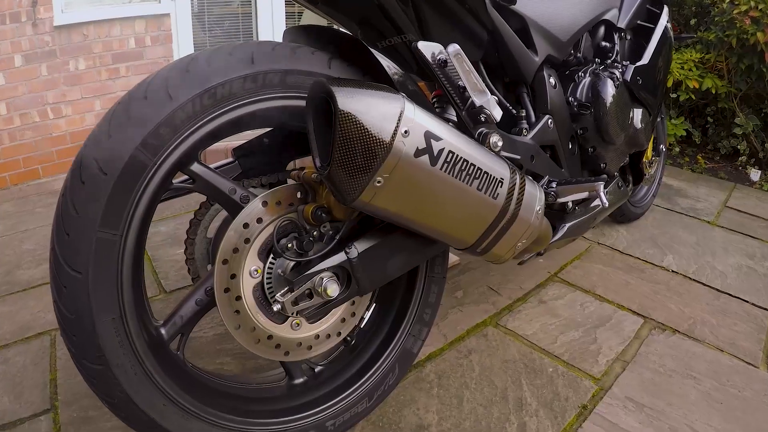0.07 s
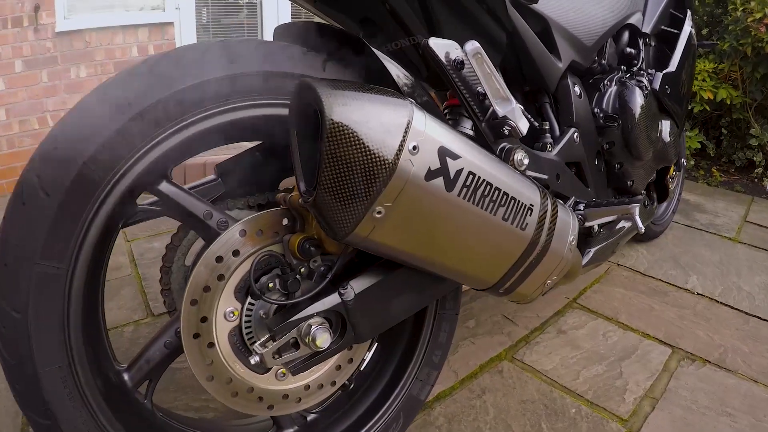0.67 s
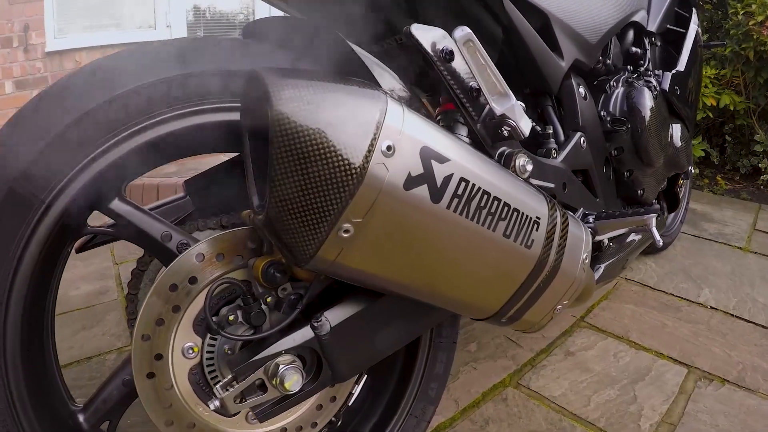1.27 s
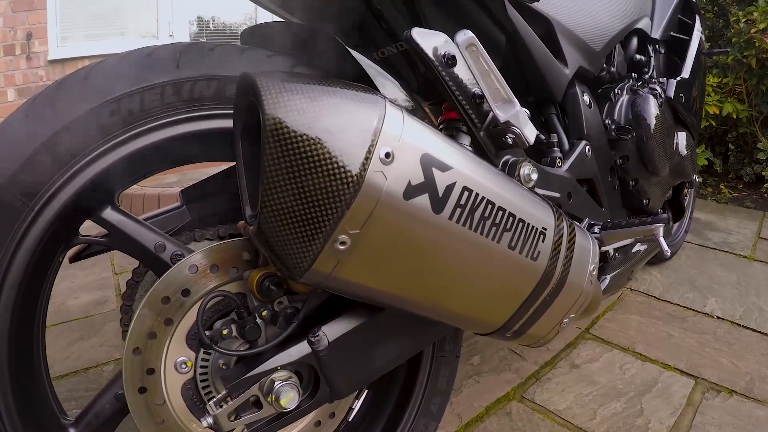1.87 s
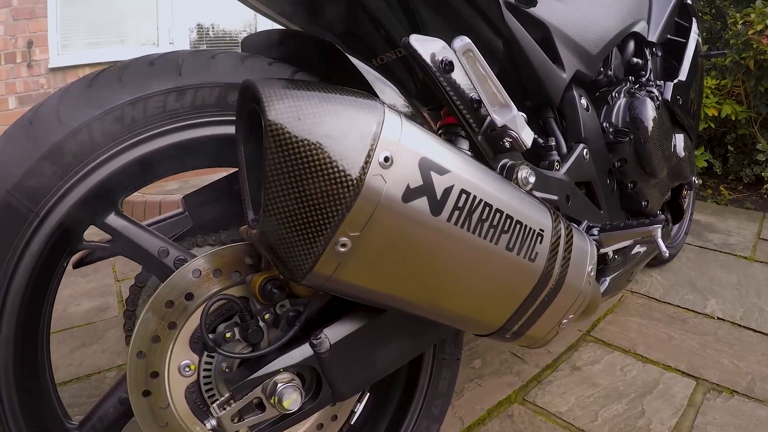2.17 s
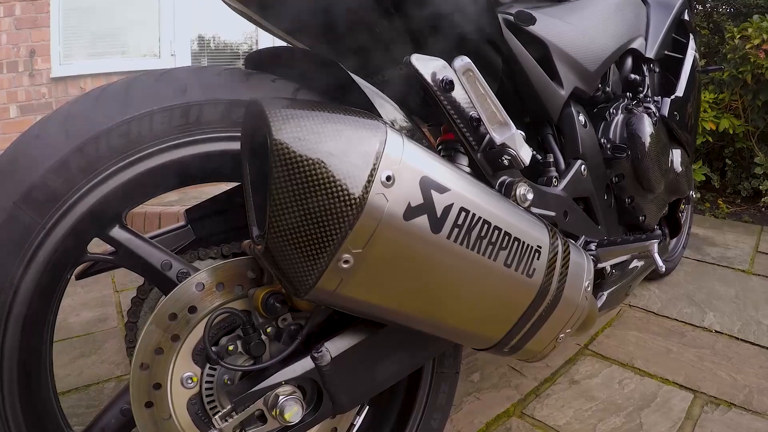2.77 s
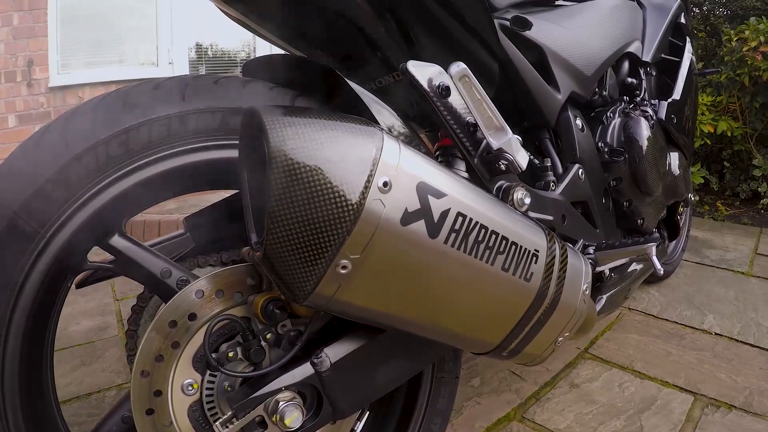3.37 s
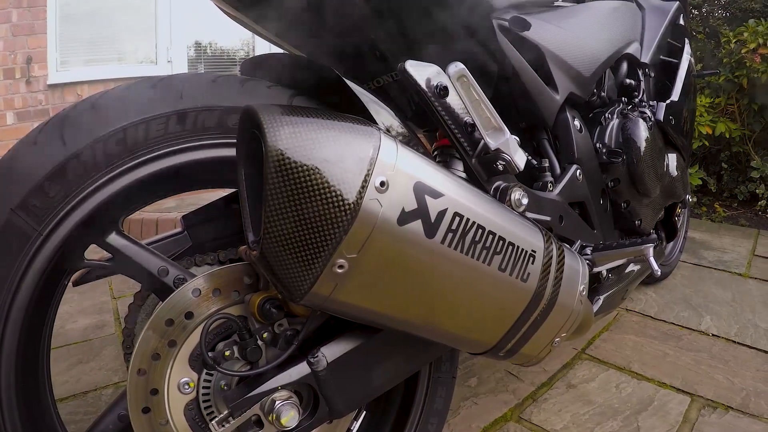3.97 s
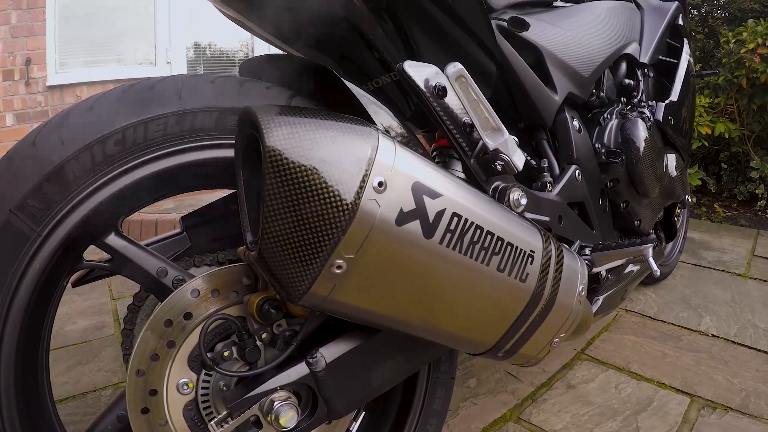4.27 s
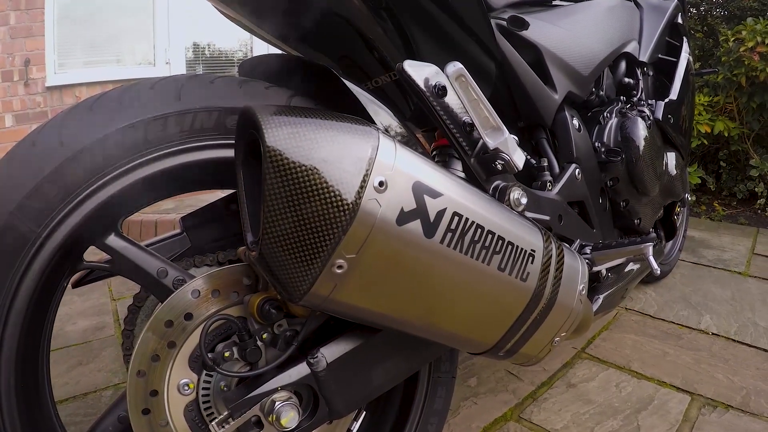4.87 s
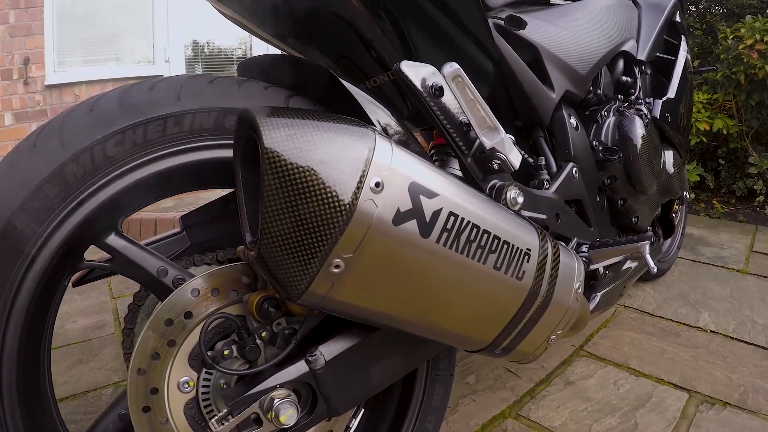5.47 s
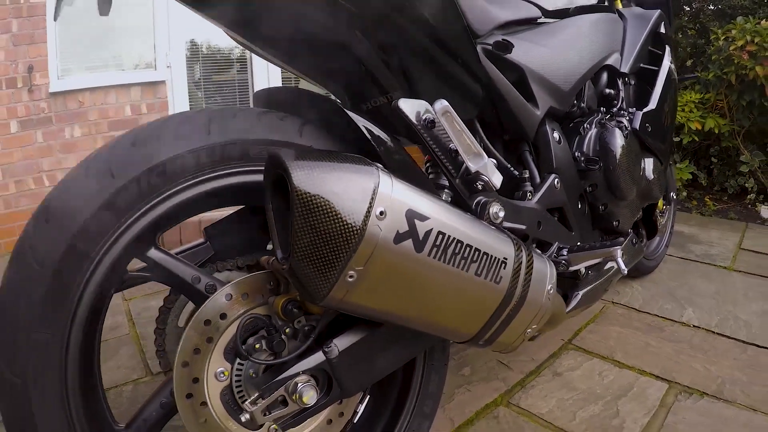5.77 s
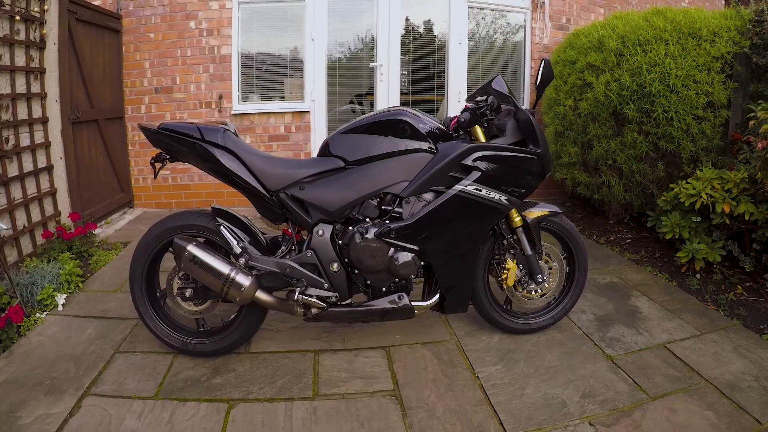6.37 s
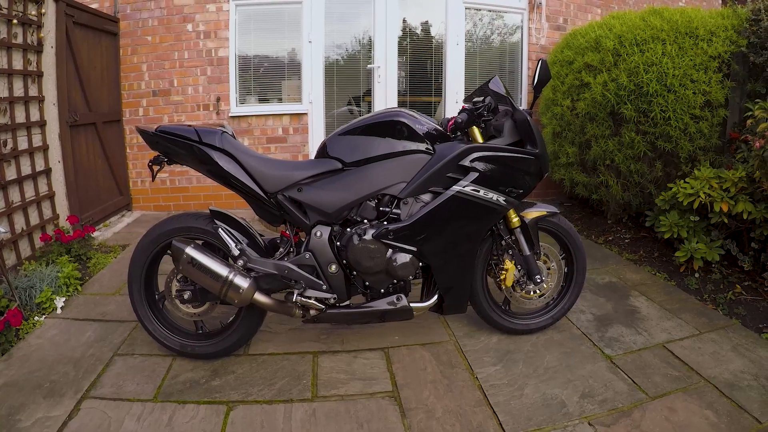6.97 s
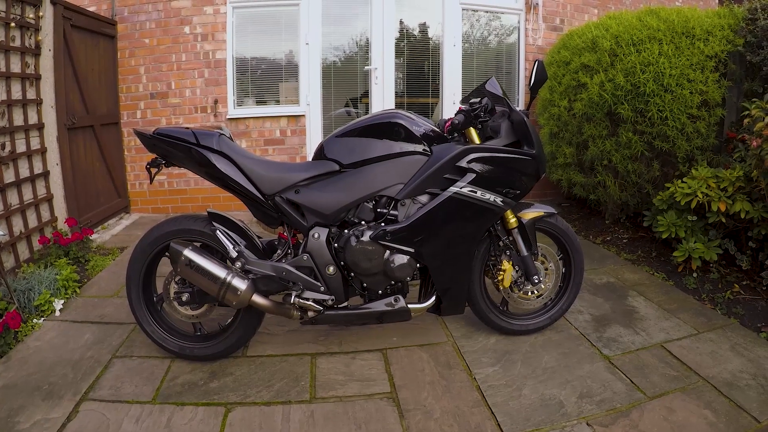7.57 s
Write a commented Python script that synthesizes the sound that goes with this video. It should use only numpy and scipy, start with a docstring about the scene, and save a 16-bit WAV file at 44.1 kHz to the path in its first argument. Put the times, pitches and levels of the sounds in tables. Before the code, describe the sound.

Close to the exhaust of a motorcycle on a patio, a deep, pulsing idle runs with faint mechanical whirring and ticking behind it. It starts a little uneven and gradually settles, with a few faint chuffs of gas reaching the microphone. Late on, the rumble briefly recedes and gives way to a wider side position, where the same idle sounds boomier, with more clatter and a faint gear whine.

```python
"""Motorcycle idling on a patio

A four-cylinder engine hunts up and down four or five times a second. Uneven firings ring the silencer
over the clatter of chain, gears and valves; now and then exhaust puffs reach the microphone.
First heard beside the tailpipe, it recedes, and a wider view from the side fades in."""
import sys
import numpy as np
from scipy import signal
from scipy.fft import rfft, irfft, next_fast_len
from scipy.io import wavfile
from scipy.ndimage import uniform_filter1d, minimum_filter1d

SR = 44100
rng = np.random.default_rng(int(sys.argv[2]) if len(sys.argv) > 2 else 0)


def digitize_waveform(pressure):
    """Quantize a signal to 16-bit integers and store it at the path in sys.argv[1].

    Rows of a 2-D input are taken as channels; values are limited to [-1, 1].
    """
    field = np.atleast_2d(pressure).T
    bounded = np.clip(field, -1, 1)
    quanta = np.round(bounded * 32767).astype(np.int16)
    wavfile.write(sys.argv[1], SR, quanta)


N = 340011

# Weak burns. Each row: time in seconds, level change in dB.
WEAK_BURNS = [(.065, -4), (.497, -10), (.945, -2.5)]
# Cylinders. Each row: blowdown moment in firing periods, low push in dB, sharp bark in dB.
CLOSE_CYLINDERS = [(.615, -2.5, 1), (.615, -1, -3), (0.608, -2, -0.5), (.613, -0.3, -3)]
WIDE_CYLINDERS = [(0.507, 0.27, 3.4), (0.5106, -0.1, -1), (0.5077, -0.094, 2.4), (0.5045, -0.31, 0.69)]
# Hunting idle. Each row: time in seconds, mean firing rate in Hz, swing in Hz, hunting rate in Hz.
CLOSE_IDLE = [(0, 45.83, 3.2, 4.2), (.79, 45.65, 2.2, 4.78), (1.03, 45.26, 2.8, 4.32),
              (1.65, 45.84, 2.1, 4.69), (3.03, 46.14, 1.35, 4.12), (3.75, 45.89, 0, 5.68),
              (3.85, 45.9, 1.45, 4.71), (5.32, 46.09, 1.0, 4.01), (6.1, 45.5, .92, 4.66)]
WIDE_IDLE = [(6.2, 45.78, 1.09, 4.11), (6.43, 46.09, 3.0, 3.49), (6.82, 45.92, 1.0, 4.53),
             (7.11, 45.8, 2.1, 5.3), (7.34, 44.77, .7, 3.54), (7.7, 47.1, 0, 4.32)]
# Silencer resonances. Each row: centre in Hz, width in Hz, gain in dB.
CLOSE_SILENCER = [(40.8, 20, -16.5), (109.2, 23.1, -3), (120, 16.02, 2.5), (164.2, 18.2, -3),
                  (249.8, 74.2, -13.5), (279.65, 25.3, -8), (334, 21.5, -15.5), (361, 81.5, -24.5)]
WIDE_SILENCER = [(46.7, 27, -18), (111.7, 17.64, 2), (132.1, 47.9, -3.5), (183.4, 14, -18),
                 (240.3, 15, -19), (263.6, 18, -7.5), (337, 46, -28), (394.5, 15, -24.5), (514, 7.1, -27)]
# Clatter and puff spectra. Each row: frequency in Hz, relative density in dB.
CLOSE_CLATTER = [(200, -7.5), (450, 0.5), (630, 2), (770, -4), (880, -2), (1500, -6.5), (2900, -11),
                 (4400, -13), (5200, -24.5), (6000, -27.5), (10300, -32.5), (12000, -37.5), (15500, -47)]
WIDE_CLATTER = [(200, -11.5), (500, -1), (940, 0.5), (1100, -5.5), (1900, -5.5), (2250, -12), (3200, -12),
                (4600, -12.5), (5200, -22.5), (6000, -28), (9800, -30), (12000, -40), (15500, -43)]
PUFF_SPECTRUM = [(10, -8), (30, -7), (100, -8), (300, 0.5), (500, 5), (750, -3.5), (1100, -12), (2000, -22),
                 (5000, -39), (15000, -50)]
# Casing and shield resonances. Each row: centre in Hz, width in Hz, lift in dB.
CLOSE_CASING = [(693, 100, -3), (1173, 140, 4.5), (1936, 200, 5), (2230, 180, -2.5), (2410, 120, 7.5)]
WIDE_CASING = [(460, 140, -8.5), (513, 22, 5), (1270, 88, 4.5), (1810, 140, 3.5), (2580, 440, 5.5),
               (4350, 100, 3.5)]
# Exhaust gusts at the microphone. Each row: start in seconds, length in seconds, level in dB.
PLUME_GUSTS = [(4.741, 0.02, -34), (4.935, .067, -32.5), (5.028, .135, -33.5), (5.93, .085, -32),
               (6.062, 0.027, -41.5)]

IDLE_HZ = 46
UNREST_DB, SETTLE_S = 2, 9.9  # firing scatter, dying down as the engine warms
RETREAT_START_S, RETREAT_M_PER_S = 5.936, 1.9
FADE_START_S, FADE_S = 6.128, 0.077


def exhaust(at, push_db, bark_db, modes, knee_hz, muffle_hz, turbulence_db):
    """Each firing rings the silencer with a low push, a sharp bark and a swirl of gas."""
    push, bark = pulses(at, amp(push_db)), pulses(at, amp(bark_db))
    swirl = amp(turbulence_db) * bark.std() * bursts(at, amp(bark_db), life_s=0.0023)
    drive = filtered(push, lambda hz: lowpass(hz, knee_hz, order=4))
    drive += filtered(bark + swirl, lambda hz: 1 - lowpass(hz, knee_hz, order=4))

    def silencer(hz):
        ring = sum((-1) ** k * amp(db) * 1j * hz * width / (centre ** 2 - hz ** 2 + 1j * hz * width)
                   for k, (centre, width, db) in enumerate(modes))
        packing = lowpass(hz, muffle_hz, order=10)  # soaks up treble
        outlet = 1 - lowpass(hz, edge_hz=30, order=8)  # too small to radiate deep bass
        return ring * packing * outlet

    return unit(filtered(drive, silencer))


def firings(rate_hz, cylinders, push_db_per_hz, bark_db_per_hz, jitter, bark_scatter):
    """Cylinders fire in turn. Returns crank angle in firings, sample positions, push dB and bark dB."""
    crank = np.cumsum(rate_hz) / SR
    chance = rng.uniform(-np.sqrt(3), np.sqrt(3), (int(crank[-1]) + 1, 3))
    n = np.arange(len(chance)) - 1  # already running
    moment, push_db, bark_db = np.array(cylinders)[n % len(cylinders)].T
    scatter = np.interp(n, crank, UNREST_DB * np.exp(-since(0) / SETTLE_S))
    at = np.interp(n + moment + jitter * scatter * chance[:, 0], crank, np.arange(N))
    surge_hz = np.interp(n + moment, crank, rate_hz - IDLE_HZ)
    stumble_db = sum(db * (n == n[np.argmin(abs(at / SR - s))]) for s, db in WEAK_BURNS)
    push_db = push_db + push_db_per_hz * surge_hz + stumble_db + scatter * chance[:, 1]
    bark_db = bark_db + bark_db_per_hz * surge_hz + stumble_db + bark_scatter * scatter * chance[:, 2]
    return crank, at, push_db, bark_db


def hunting(idle, crest_s, trough=0.16):
    """Firing rate in Hz: the idle sags in sharp dips between rounded crests."""
    times_s, *columns = np.transpose(idle)
    mean_hz, swing_hz, hunt_hz = (np.interp(since(0), times_s, column) for column in columns)
    cycles = np.cumsum(hunt_hz) / SR
    angle = 2 * np.pi * (cycles - cycles[round(crest_s * SR)])
    return mean_hz + swing_hz * (np.cos(angle) - trough * np.cos(2 * angle))


def clatter(crank, at, spectrum, casing, tick_db, gas_db, valve_spread_db, valves=16):
    """Whirring chain and gears, valve ticks and a gust of gas per firing, coloured by the casings."""
    n = np.arange(int(crank[-1] * 4))  # four ticks per firing
    chance = rng.uniform(-np.sqrt(3), np.sqrt(3), (len(n), 2))
    ticks_at = np.interp(n / 4 + 0.02 * chance[:, 0], crank, np.arange(N))
    # each valve has its own clearance: the pattern repeats every cam turn
    clearance_db = valve_spread_db * rng.permutation(np.linspace(-1, 1, valves))
    ticks = bursts(ticks_at, amp(clearance_db[n % valves] + 4.3 * chance[:, 1]), life_s=0.00043)
    gas = bursts(at, np.ones(len(at)), life_s=0.0034)
    whirr = rng.standard_normal(N)
    knocks = unit(whirr + amp(tick_db) * ticks + amp(gas_db) * gas)
    ringing = knocks + amp(-10) * metal_ring(knocks)

    def lift_db(hz):
        return sum(db / (1 + (2 * (hz - centre) / width) ** 2) for centre, width, db in casing)

    return unit(filtered(ringing, lambda hz: colour(spectrum, hz) * amp(lift_db(hz))))


def metal_ring(knocks, t60_s=0.015):
    """The many small modes of the metal ring on briefly."""
    t = np.arange(SR // 10) / SR
    tail = rng.standard_normal(len(t)) * amp(-60 * t / t60_s)
    return unit(signal.fftconvolve(knocks, tail)[:N])


def gear_whine(crank, cycles_per_firing=11):
    """A gear tone locked to the crank."""
    return unit(np.sin(2 * np.pi * cycles_per_firing * crank))


def puffs(at, travel_s=0.008, edge_s=0.013):
    """While the plume drifts onto the microphone, each firing lands as a soft chuff."""
    sizes = np.ones(len(at))
    swirls = unit(pulses(at, sizes)) + bursts(at, sizes, life_s=0.0009)
    chuffs = unit(filtered(swirls, lambda hz: colour(PUFF_SPECTRUM, hz)))
    plume = sum(amp(db) * (ramp(start_s, edge_s) - ramp(start_s + length_s, edge_s))
                for start_s, length_s, db in PLUME_GUSTS)
    return plume * np.roll(chuffs, round(travel_s * SR))


def close_view():
    """Beside the tailpipe: a throaty beat over light clatter."""
    rate_hz = hunting(CLOSE_IDLE, crest_s=0.215)
    crank, at, push_db, bark_db = firings(rate_hz, CLOSE_CYLINDERS, push_db_per_hz=0.96,
                                          bark_db_per_hz=0.032, jitter=0.0066, bark_scatter=0.97)
    beat = exhaust(at, push_db, bark_db, CLOSE_SILENCER, knee_hz=190, muffle_hz=469, turbulence_db=-12)
    beat *= drift(-9, db_per_s=-0.12) * receding(distance_m=0.3)
    engine = clatter(crank, at, CLOSE_CLATTER, CLOSE_CASING, tick_db=-9, gas_db=-6.5, valve_spread_db=6.5)
    engine *= drift(-35.5, db_per_s=-0.36) * receding(distance_m=0.45)
    return beat + engine + puffs(at)


def wide_view():
    """From the side, before the house wall: boomier, with more of the engine."""
    rate_hz = hunting(WIDE_IDLE, crest_s=6.315)
    crank, at, push_db, bark_db = firings(rate_hz, WIDE_CYLINDERS, push_db_per_hz=0.61,
                                          bark_db_per_hz=1.9, jitter=0.0087, bark_scatter=1.1)
    beat = exhaust(at, push_db, bark_db, WIDE_SILENCER, knee_hz=188, muffle_hz=554, turbulence_db=-19)
    beat *= drift(-7.5, db_per_s=1.1, start_s=FADE_START_S)
    engine = clatter(crank, at, WIDE_CLATTER, WIDE_CASING, tick_db=-7.5, gas_db=-5, valve_spread_db=4)
    engine += amp(-10) * gear_whine(crank)
    engine *= drift(-33, db_per_s=-0.17, start_s=FADE_START_S)
    return beat + engine


def receding(distance_m):
    """Gain falls with distance as the microphone is pulled away."""
    return distance_m / (distance_m + RETREAT_M_PER_S * since(RETREAT_START_S))


def bursts(at, sizes, life_s):
    """Noise bursts that swell and die, rms 1 overall."""
    age = np.arange(SR // 20) / SR / life_s
    envelope = signal.fftconvolve(pulses(at, sizes), age * np.exp(-age))[:N]
    return unit(envelope * rng.standard_normal(N))


def pulses(at, sizes):
    """Impulses at fractional sample positions."""
    i, part = at.astype(int), at % 1
    return (np.bincount(i, sizes * (1 - part), N + 1) + np.bincount(i + 1, sizes * part, N + 1))[:N]


def filtered(x, response):
    """Apply a complex frequency response."""
    size = next_fast_len(N + SR // 2)
    return irfft(rfft(x, size) * response(np.fft.rfftfreq(size, 1 / SR)), size)[:N]


def colour(spectrum, hz):
    """Gain of (Hz, dB) points joined on a log axis."""
    points_hz, db = np.transpose(spectrum)
    return amp(np.interp(np.log(hz + 1), np.log(points_hz), db))


def lowpass(hz, edge_hz, order):
    """Gain of a smooth roll-off."""
    return 1 / (1 + (hz / edge_hz) ** order)


def drift(db, db_per_s, start_s=0):
    """Gain of a slowly drifting level."""
    return amp(db + db_per_s * since(start_s))


def ramp(start_s, length_s):
    """Linear rise from 0 to 1."""
    return np.minimum(since(start_s) / length_s, 1)


def since(start_s):
    """Seconds since start_s, zero before."""
    return np.maximum(np.arange(N) / SR - start_s, 0)


def amp(db):
    """Decibels to gain."""
    return 10 ** (np.asarray(db) / 20)


def unit(x):
    """Scale to rms 1."""
    return x / np.sqrt(np.mean(x ** 2) + 1e-20)


def scene():
    """The close view cross-fades to the wide view."""
    fade = ramp(FADE_START_S, FADE_S)
    return ((1 - fade) * close_view() + fade * wide_view())[None]


def record(dry):
    """Fast peak limiter at full scale, then a band limit."""
    window, top_hz = SR // 200, 15720
    needed_gain = 1 / np.maximum(abs(dry[0]), 1)
    gain = uniform_filter1d(minimum_filter1d(needed_gain, window), window)
    return filtered(dry[0] * gain, lambda hz: hz < top_hz)[None]


dry = scene()
out = record(dry)
digitize_waveform(out)
```